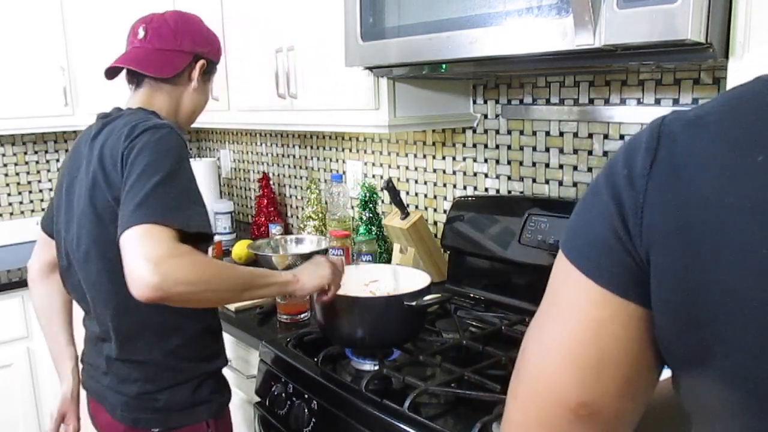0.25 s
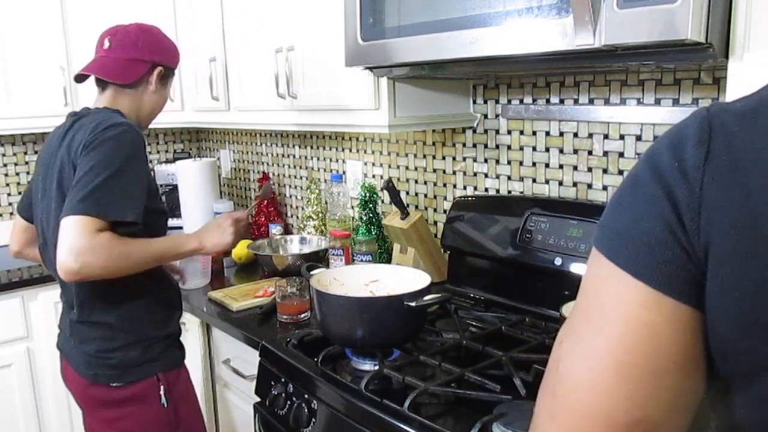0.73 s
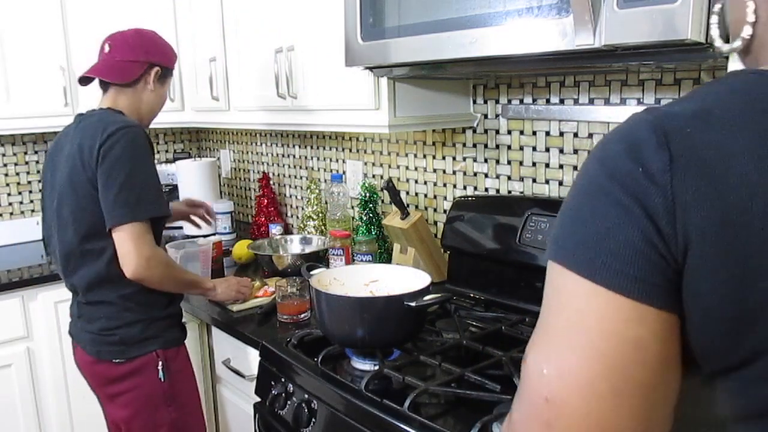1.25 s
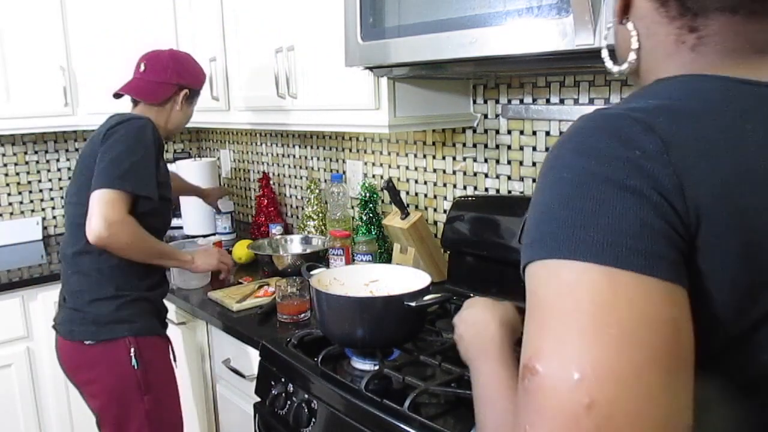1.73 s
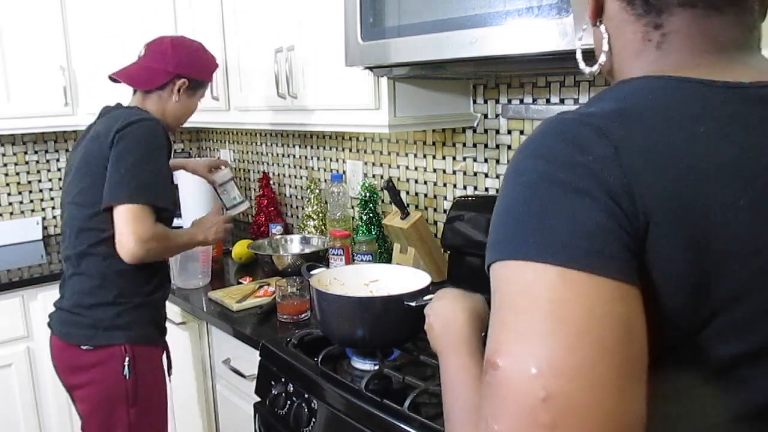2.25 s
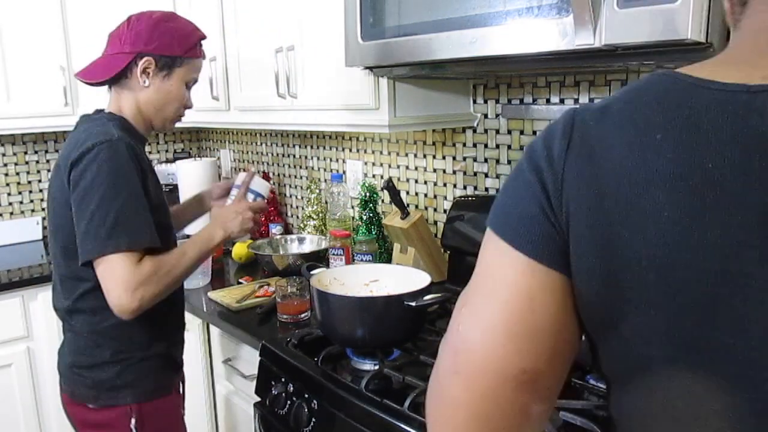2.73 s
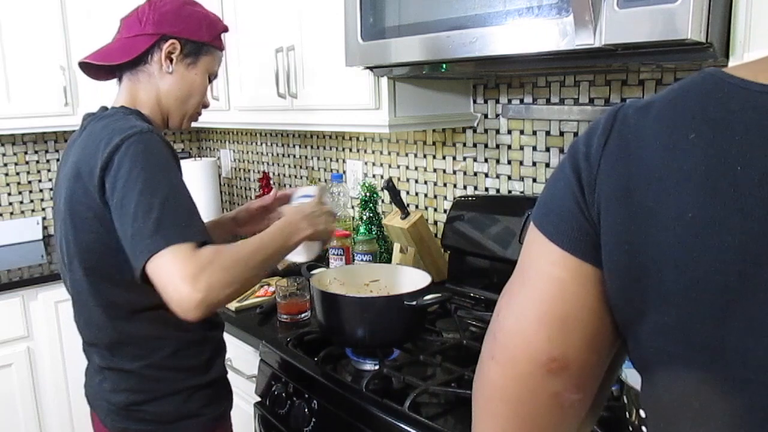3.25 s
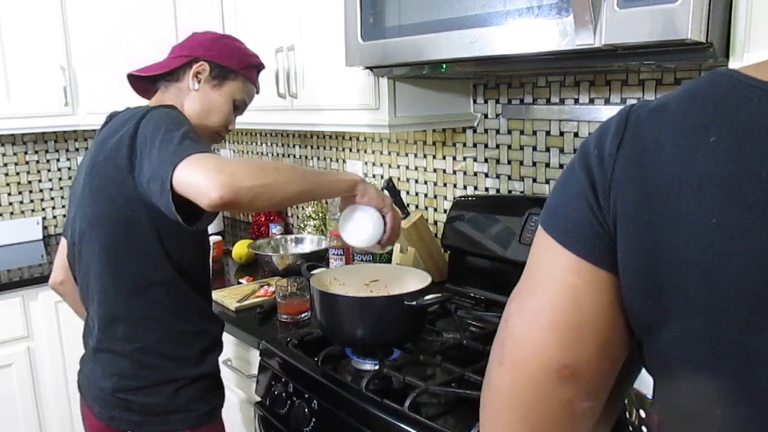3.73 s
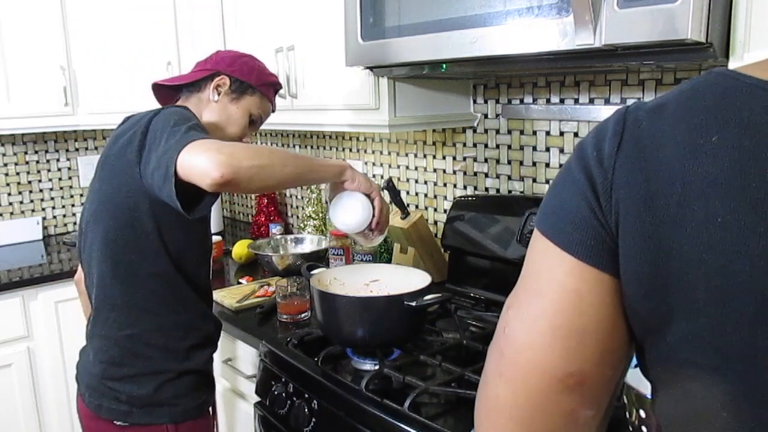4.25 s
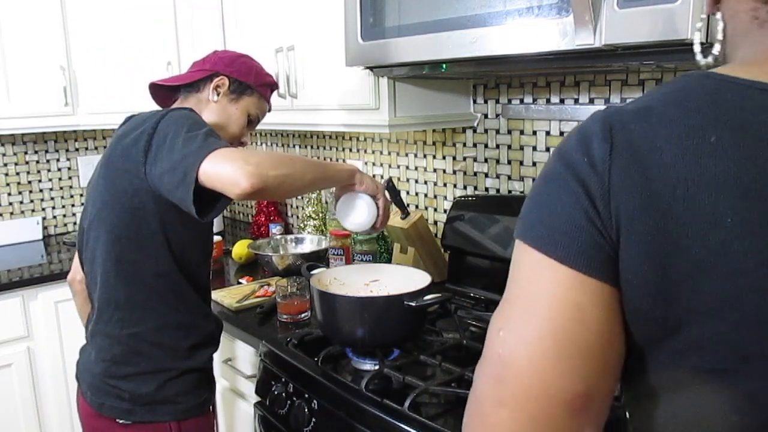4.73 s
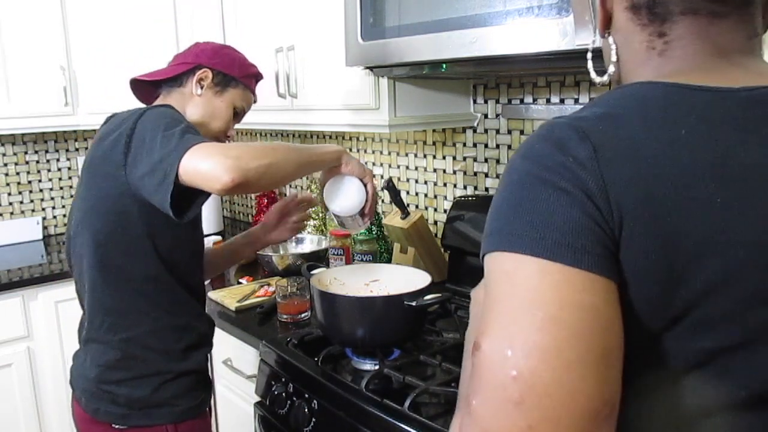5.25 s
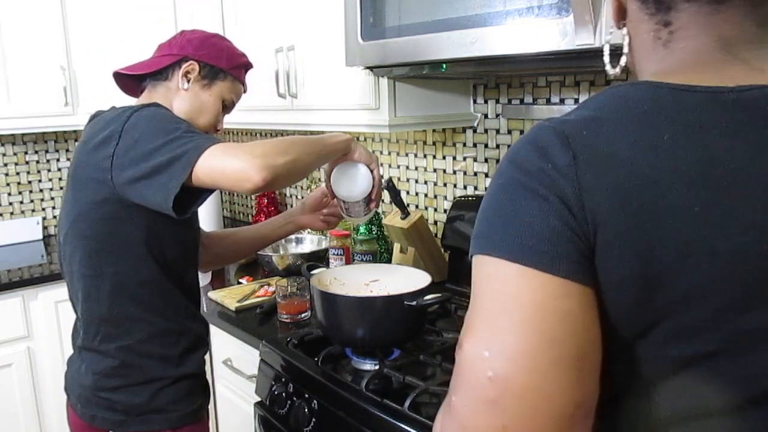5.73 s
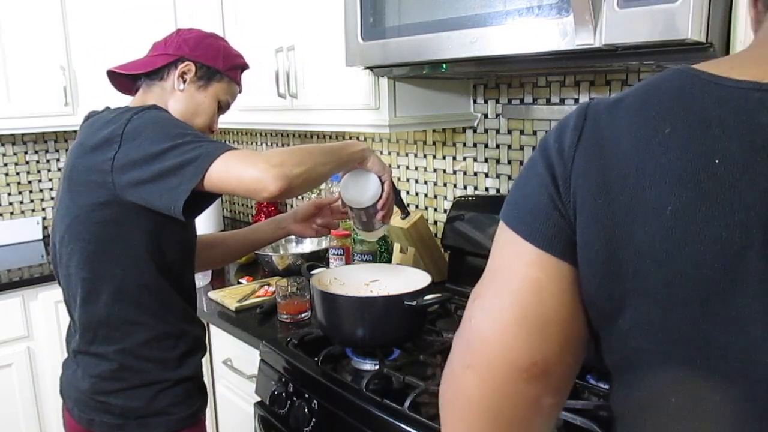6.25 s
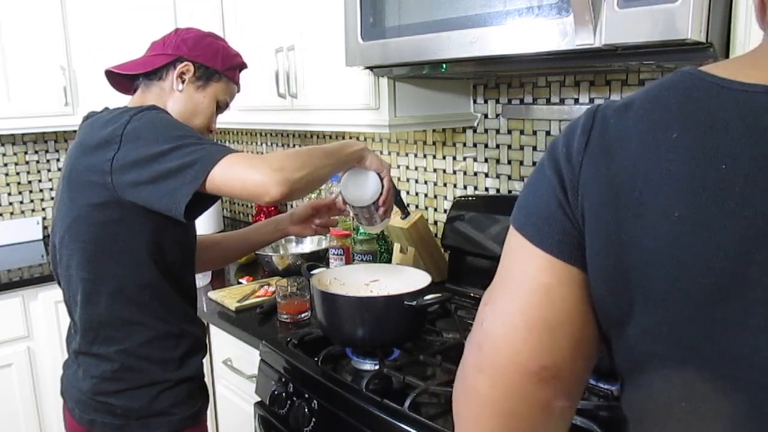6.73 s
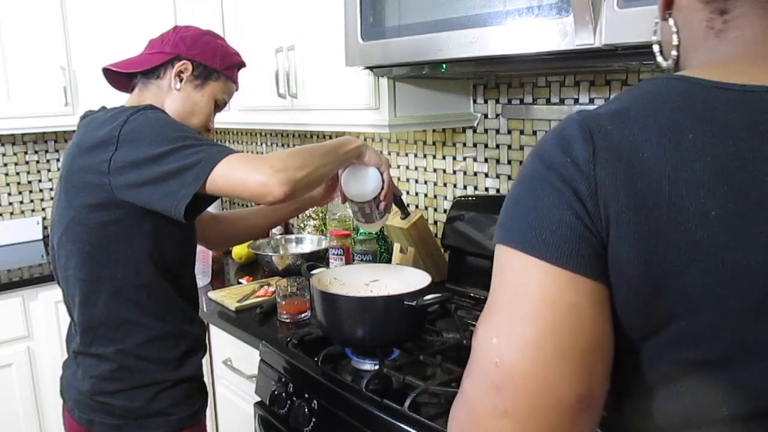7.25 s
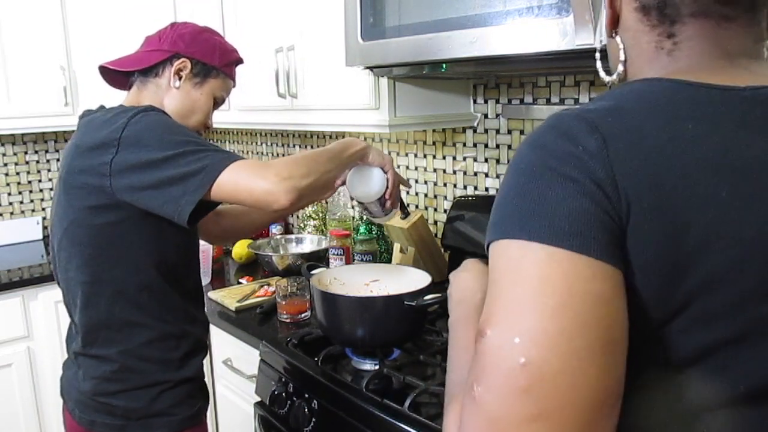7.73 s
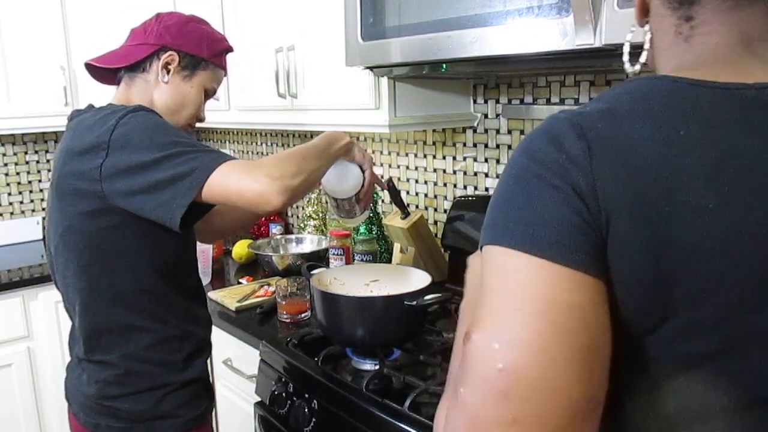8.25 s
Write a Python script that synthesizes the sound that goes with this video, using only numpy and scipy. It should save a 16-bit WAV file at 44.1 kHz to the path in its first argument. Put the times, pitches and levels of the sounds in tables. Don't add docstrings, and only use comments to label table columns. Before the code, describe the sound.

A small stereo microphone a few steps away hears a hard, reverberant kitchen with low gas-flame rumble, faint hum and smooth hiss. The tail of an earlier knock opens it; a spoon strikes a filled pot's rim at 0.2 and 0.47 s, bright, clanky and quickly damped, with a dull stove thump. Light ticks come at 1.3 s, then the spoon clacks onto a board at 1.55 s. From 1.9 to 2.8 s a cardboard salt drum is picked up: hollow knocks, scrapes, clicks and sliding grains; a faint tap at 3.1. From 3.4 to 5.1 s salt hisses in quick strokes, about eleven a second, gradually softening. A strong hollow tap at 5.4 s leads into lighter taps, rubbing and clicks; softer shakes return at 6.2-6.6 s. From 7.0 s to the end at 8.5, finger taps fall about every 0.2 s, with grain puffs and crisp ticks.

```python
import sys
import numpy as np
from scipy import signal
from scipy.fft import rfft, irfft, next_fast_len
from scipy.io import wavfile

SR = 44100
rng = np.random.default_rng(int(sys.argv[2]) if len(sys.argv) > 2 else 0)


def pcm_store(signal):
    levels = np.round(np.clip(np.atleast_2d(signal), -1, 1) * 32767)
    wavfile.write(sys.argv[1], SR, levels.astype(np.int16).T)


def gain_from_db(level_db):
    decades = np.asarray(level_db, float) / 20
    return 10 ** decades


N = 374850
LEAD_S = 0.15
M = N + round(LEAD_S * SR)


# peak in [s], level in [dB].
SHAKES = [(3.432, -42), (3.539, -39.5), (3.624, -37.5), (3.72, -40), (3.765, -40), (3.827, -38),
          (3.91, -40), (4.002, -41.5), (4.102, -43), (4.179, -42), (4.27, -42), (4.354, -42.5),
          (4.447, -43), (4.528, -42.5), (4.62, -44.5), (4.702, -51), (4.798, -44), (4.883, -41),
          (4.959, -44), (5.06, -48), (6.172, -42.5), (6.252, -47), (6.32, -51.5), (6.386, -46.5),
          (6.448, -44), (6.524, -42), (6.594, -46)]
# peak in [s], level in [dB], length in [ms].
SLIDES = [(1.967, -51.5, 42), (2.224, -49, 83), (2.3, -55.5, 200), (2.752, -53, 32), (2.83, -58.5, 270),
          (5.605, -39.5, 47), (5.73, -55, 120), (8.025, -51, 32), (8.097, -45.5, 82), (8.27, -50.5, 51),
          (8.38, -50.5, 60), (8.455, -49.5, 82)]


def surges():
    s, db = np.transpose(SHAKES)
    gaps_ms = 1000 * np.diff(s, prepend=0, append=N / SR)
    mean_gap_ms = (gaps_ms[1:] + gaps_ms[:-1]) / 2
    throw_ms = np.minimum(0.65 * mean_gap_ms, 59)

    pouring_s = 3.4
    jump_s, jump_ms = 0.052, 41
    jumps = []
    for tap_s, *_, snap_db in TAPS:
        if pouring_s < tap_s < N / SR - jump_s:
            jump_db = -48 + 0.42 * (snap_db + 37)
            jumps.append((tap_s + jump_s, jump_db, jump_ms))
    return [*zip(s, db, throw_ms), *SLIDES, *jumps]


# frequency in [Hz], density in [dB per Hz].
SALT = [(1290, -26), (2200, -11.5), (3130, -12), (3600, -7), (3900, -7.5), (4640, -2.5), (5690, 1.5),
        (7650, -7), (8370, -5.5), (9940, -11.5), (13200, -8.5), (15600, -16)]
# time in [s], gain above 8 kHz in [dB].
SPOUT = [(3.6, 4), (5.2, 1.5), (5.7, 3), (8.5, 5.5)]


def salt():
    t, power = np.arange(M) / SR - LEAD_S, np.zeros(M)
    for s, db, ms in surges():
        near = slice(round((s + LEAD_S - 0.15) * SR), round((s + LEAD_S + 0.15) * SR))
        late = (t[near] - s) * 1665 / ms
        steepness = np.where(late < 0, 1.35, 1.15)
        power[near] += gain_from_db(2 * db) * np.exp(-(late * steepness) ** 2)

    strength = gain_from_db(1.8 * np.minimum(rng.exponential(1, M), 5))
    hits = rng.random(M) < 12000 / SR
    hiss = colour(strength * hits * pair(0.38), SALT)
    fine = signal.sosfilt(signal.butter(2, 8000, "high", fs=SR, output="sos"), hiss)
    spout_gain = gain_from_db(in_time(SPOUT)[0])
    return np.sqrt(power) * gain_from_db(0.5 * drift(60)) * (hiss + (spout_gain - 1) * fine)


# start in [s], then levels of air thud, lid, wall and snap in [dB].
TAPS = [(1.907, -39.5, -45.5, -39, -37.5), (3.075, -48.5, -70, -56, -48), (5.426, -30, -28, -31, -38),
        (5.635, -46, -38, -34.5, -43), (5.808, -38.5, -32, -38.5, -43.5), (6.013, -44, -62, -44, -50),
        (6.265, -41, -55, -45, -54), (7.021, -34.5, -38, -34, -32), (7.23, -36, -56, -35.5, -38.5),
        (7.433, -33.5, -40, -34.5, -32.5), (7.633, -33, -49.5, -61, -35), (7.828, -36.5, -43.5, -52, -34),
        (8.042, -34.5, -45, -43, -34.5), (8.252, -36.5, -57, -36.5, -37), (8.452, -34.5, -44, -50, -36.5)]
# frequency in [Hz], level in [dB], t60 in [s].
DRUM = [
    [(269.5, 7, 0.047)],
    [(468, 0, 0.13), (571, 0, 0.065)],
    [(733, -1.5, 0.16), (1200, -15, 0.06)],
    [(2050, 1.5, 0.033), (2340, -16, .025)],
    [(4800, 1.5, 0.018)],
]
# frequency in [Hz], width as a [ratio],
# level above the group in [dB], t60 in [s].
BODY = [(268, 1.64, -2, 0.13), (448, 1.22, -2, 0.16), (850, 1.84, -7.5, 0.3), (2145, 1.09, -3.5, 0.057),
        (5000, 1.67, -4.5, 0.1)]


def taps():
    bus = np.zeros((2, M))
    for s, *levels, snap_db in TAPS:
        slap_db = snap_db - 2.5
        levels = [*levels, slap_db, snap_db]
        modes = [(hz, d + db, t60) for group, db in zip(DRUM, levels) for hz, d, t60 in group]
        add(bus, s, ring(modes, contact_ms=0.77))
        for (hz, width, d, t60), db in zip(BODY, levels):
            alike = np.clip(1.05 - hz / 9000, 0, 1)
            add(bus, s, clatter(db + d, band(hz, width, 6.56), t60, alike, rise_ms=1300 / hz))
    return bus


# start in [s], length in [s], level in [dB].
DRAG = [
    (2.086, 0.051, -58),
    (2.19, 0.35, -58.5),
    (5.474, .43, -60),
]


def drag():
    t = np.arange(M) / SR - LEAD_S
    resonance = signal.butter(2, [1330, 1680], "band", fs=SR, output="sos")
    rub = signal.sosfilt(resonance, rng.standard_normal(M))
    attack_s, release_s, sag_db = 0.027, 0.032, -4.5
    stroke = np.zeros(M)
    for s, length, db in DRAG:
        corners_s = [s - attack_s, s, s + length, s + length + release_s]
        stroke += np.interp(t, corners_s, [0, gain_from_db(db), gain_from_db(db + sag_db), 0])
    return stroke * gain_from_db(1.7 * drift(30)) * rub / rub.std()


# start in [s], level in [dB], frequency in [Hz], sharpness of the peak in [dB].
CONTACTS = [(1.271, -46, 5700, 6), (1.305, -35, 1150, 6), (1.304, -43.5, 535, 4.5),
            (1.304, -40.5, 2600, 3.5), (1.3376, -42, 10500, 2), (1.909, -32.5, 570, 8.5),
            (1.922, -31.5, 548, 12), (2.064, -45, 1730, 4), (2.169, -40.5, 6400, 5), (2.189, -40, 2260, 3),
            (2.199, -39.5, 2020, 6), (2.289, -36.5, 4230, 1), (2.435, -44, 1510, 1), (2.722, -43, 3260, 5),
            (2.735, -38, 8630, 16), (2.75, -39.5, 5470, 14), (2.821, -39, 7400, -2), (3.216, -43, 4250, 6),
            (5.3474, -45, 8800, 14), (5.374, -44, 2800, 12), (5.427, -46, 112.3, 20), (5.582, -42, 4800, 11),
         (5.597, -26, 6200, 10), (5.7743, -37, 7800, 12), (5.81, -51, 90, 11), (6.015, -43, 127, 2.5),
         (6.258, -36.5, 616, 7), (6.687, -38, 2410, 4.5), (6.7, -46, 3260, 5), (6.829, -45, 5400, 7),
         (6.949, -44, 850, 8), (7.216, -31.5, 2660, 16.5), (7.5527, -39.5, 8850, 11), (7.734, -44, 814, 3),
         (8.02, -31.5, 6050, 2), (8.095, -37, 6100, 14), (8.1394, -35, 7740, 8), (8.171, -39, 805, 6),
         (8.2422, -32, 1677, 9), (8.3304, -35, 8300, 9), (8.425, -34.5, 5480, 12)]


def ticks():
    bus = np.zeros((2, M))
    for s, db, hz, sharp_db in CONTACTS:
        t60 = 0.066 * (hz / 1000) ** -0.21
        add(bus, s, clatter(db - 3.0, band(hz, 1.152, sharp_db), t60, 0.83, rise_ms=1.0))
        add(bus, s, ring([(hz, db - 15.5 + 0.52 * sharp_db, t60)], contact_ms=0.9))
    return bus


def spoon_blows(blows, modes, spectrum):
    bus = np.zeros((2, M))
    for s, db, tilt, clatter_db, t60 in blows:
        struck = [(hz, db + d + tilt * np.log2(hz / 3000), mode_t60) for hz, d, mode_t60 in modes]
        add(bus, s, ring(struck, contact_ms=2.1))
        add(bus, s, clatter(clatter_db, spectrum, t60, 0.97, rise_ms=0.34))
        add(bus, s, clatter(clatter_db + 1.5, band(3750, 2.83, 18.0), 0.0066, 0.58, rise_ms=0.2))
    return bus


# start in [s], ring in [dB], brightness in [dB per octave], clatter in [dB],
# clatter t60 in [s].
KNOCKS = [
    (-.09, -24, -1.5, -15, 0.086),
    (0.1898, -23.5, 1, -13.5, 0.071),
    (0.4658, -22, 1.3, -13, 0.046),
]
# frequency in [Hz], level in [dB], t60 in [s].
POT = [(232, -5, .08), (410, -8, 0.11), (464, -24, 0.081), (590, -1, 0.085), (730, -4, 0.047),
       (1076, -3.5, 0.034), (2600, -4, 0.037), (3350, -19, 0.037), (4370, -11, 0.042), (4850, -13, 0.037),
       (5400, -14, 0.02), (5500, 3, 0.034), (5700, -7, 0.03), (5670, -13, 0.019), (6920, 7, 0.031),
       (6800, -19, 0.051), (6800, -17, 0.03), (7500, 1, 0.047), (8610, -5.5, 0.089), (9900, -8, .05),
       (11100, -16, .16), (12070, -18, 0.08), (14200, -21, .05)]
# frequency in [Hz], density in [dB per Hz].
POT_CLATTER = [(88, -71), (150, -27), (260, -11.5), (500, -4.5), (800, -10.5), (1130, -9), (1270, -17),
               (1900, -18), (2610, -16.5), (3360, -10), (3850, -24), (5500, -3.5), (6350, -9),
               (7200, -10.5), (8060, -13.5), (8710, -13), (10600, -26), (11900, -13), (15600, -23.5)]


def pot_knocks():
    return spoon_blows(KNOCKS, POT, POT_CLATTER)


# frequency in [Hz], density in [dB per Hz].
THUMP = [(30, -2), (55, 12), (110, -31), (200, -10), (400, -18)]


def stove():
    bus = np.zeros((2, M))
    for s, db, *_ in KNOCKS:
        add(bus, s + 0.0022, clatter(db - 18, THUMP, 0.45, 0.87, rise_ms=8.8))
    return bus


# start in [s], ring in [dB], brightness in [dB per octave],
# clatter in [dB], clatter t60 in [s].
LAID = [
    (1.528, -63, -9, -41, 0.11),
    (1.542, -58, -7, -33, .05),
    (1.553, -43, 0.5, -27, 0.061),
    (1.57, -44.5, -12.5, -37, 0.037),
]
# frequency in [Hz], level in [dB], t60 in [s].
SPOON = [(1093, -3.5, 0.029), (2950, 11, 0.022), (4480, -3, 0.17), (7027, 6, 0.16), (8160, -20, .06),
         (11530, -17, .15), (13220, -11, .1), (10200, -7, .2), (11100, -10, .2)]
# frequency in [Hz], density in [dB per Hz].
SPOON_CLATTER = [(180, -44), (300, -6), (1070, -3.5), (2390, -4.5), (2900, 0.5), (6070, -12.5), (7130, -7),
                 (7720, -15), (14000, -43)]


def spoon_laid():
    return spoon_blows(LAID, SPOON, SPOON_CLATTER)


# frequency in [Hz], t60 in [s].
KITCHEN = [(120, 0.71), (400, 0.48), (1500, 0.74), (5000, 0.45), (10000, 0.52), (15000, 0.33)]


def kitchen(x, alike_hz):
    t, tail = np.arange(SR) / SR, 0
    for hz in 60 * 2 ** np.arange(9):
        edges_hz = [hz / 2 ** 0.5, min(hz * 2 ** 0.5, 0.45 * SR)]
        octave = signal.butter(2, edges_hz, "band", fs=SR, output="sos")
        noise = pair(1 / (1 + (hz / alike_hz) ** 2), size=SR)
        tail = tail + signal.sosfilt(octave, noise) * gain_from_db(-60 * t / at_hz(KITCHEN, hz))
    tail = tail * (1 - np.exp(-t / 0.003))
    return signal.fftconvolve(x, tail / np.sqrt(np.sum(tail ** 2) / 2), axes=1)[:, :M]


# time in [s], gain in [dB].
GAIN = [(0.9, -8), (2.19, -1.5), (3.42, 0.5), (3.65, -0.5), (4.77, 0.8), (5.3, -2), (5.56, 1.5),
        (6.74, -0.3), (8.5, 2.5)]
# frequency in [Hz], density in [dB per Hz].
RUMBLE = [(15, -38), (25, -4.5), (54, -3.5), (166, -7), (286, -4), (378, -7), (423, -6.5), (465, -3.5),
          (560, -3.5), (689, -4.5), (947, -2.5), (1140, -17), (1480, -9), (2200, -20), (2860, -31),
          (4840, -120)]
# frequency in [Hz], density in [dB per Hz].
HISS = [(650, -21), (1100, -4), (1220, -8), (1300, -6.5), (1620, -10), (2090, -14), (2240, -8.5),
        (3340, -10.5), (6420, -9), (10000, -15), (15600, -17.5)]


def background():
    gain_db, = in_time(GAIN)
    rumble_db, hiss_db = -53.5 + 0.36 * gain_db, -51.5 + gain_db
    rumble = gain_from_db(rumble_db + 1.6 * drift(39)) * colour(pair(0.24), RUMBLE)
    hiss = gain_from_db(hiss_db + 0.5 * drift(1.1)) * colour(pair(0.2), HISS)

    hum_hz, hum_db = 56, -72
    waver_db, slip_rad = 1.8 * drift(3), 0.7 * drift(2.5)
    hum = gain_from_db(hum_db + waver_db) * np.sin(2 * np.pi * hum_hz * np.arange(M) / SR + slip_rad)
    return rumble + hum + hiss


def ring(modes, contact_ms):
    t = np.arange(SR // 3) / SR
    hz, db, t60 = np.transpose(modes)[:, :, None, None]
    ear_phase = rng.normal(0, 1, (len(hz), 2, 1)) * np.minimum(hz / 2500, 1.5)
    phase = rng.uniform(0, 2 * np.pi, hz.shape) + ear_phase
    rise = 1 - np.exp(-t * 1000 / (0.15 * contact_ms + 1500 / hz))
    return np.sum(rise * gain_from_db(db - 60 * t / t60) * np.sin(2 * np.pi * hz * t + phase), axis=0)


def clatter(db, spectrum, t60, alike, rise_ms):
    t = np.arange(SR // 4) / SR
    fade = gain_from_db(db - 60 * t / t60) * (1 - np.exp(-t * 1000 / rise_ms))
    return fade * colour(pair(alike, size=len(t)), spectrum)


def band(hz, width, skirt_db):
    return [(hz / width ** 4, -5 * skirt_db), (hz / width, -skirt_db), (hz, 0), (hz * width, -skirt_db),
            (hz * width ** 4, -3.5 * skirt_db), (hz * width ** 10, -9 * skirt_db)]


def at_hz(points, hz):
    points = np.array(points)
    return np.interp(np.log(np.maximum(hz, 1)), np.log(points[:, 0]), points[:, 1])


def in_time(rows):
    s, *columns = np.transpose(rows)
    return [np.interp(np.arange(M) / SR - LEAD_S, s, c) for c in columns]


def colour(x, spectrum):
    length = x.shape[-1]
    size = next_fast_len(length)
    gain = gain_from_db(at_hz(spectrum, np.arange(size // 2 + 1) * SR / size))
    y = irfft(rfft(x, size) * gain, size)[..., :length]
    return y / np.sqrt(np.mean(y ** 2))


def pair(alike, size=M):
    mid, side = rng.standard_normal((2, size))
    return np.sqrt((1 + alike) / 2) * mid + np.sqrt((1 - alike) / 2) * side * [[1], [-1]]


def drift(rate):
    r = np.exp(-80 * np.pi * rate / SR)
    slow = signal.lfilter([1], [1, -2 * r, r * r], rng.standard_normal(M // 40 + 2002))[2000:]
    return np.interp(np.arange(M) / 40, np.arange(len(slow)), slow / slow.std())


def add(bus, s, sound):
    at = round((s + LEAD_S) * SR)
    bus[:, at:at + sound.shape[-1]] += sound[..., :M - at]


def scene():
    grains, drum, pot = salt(), taps(), pot_knocks()
    small = spoon_laid() + ticks() + drag()
    wet = gain_from_db(-5) * grains + gain_from_db(-8.0) * drum + gain_from_db(-1.0) * pot + gain_from_db(-1.0) * small
    direct = gain_from_db(2.0) * grains + drum + pot + stove() + small
    return (direct + kitchen(wet, alike_hz=620) + background())[:, -N:]


def band_limit(x):
    return signal.sosfilt(signal.butter(12, 17020, fs=SR, output="sos"), x)


# frequency in [Hz], left minus right in [dB].
LEAN = [(60, -0.5), (150, -0.5), (380, -1.5), (950, -2), (2380, 1.5), (5980, 4.0), (15000, 8.5)]


def record(dry):
    size = next_fast_len(N)
    lean_db = at_hz(LEAN, np.arange(size // 2 + 1) * SR / size) / 2
    x = irfft(rfft(dry, size) * gain_from_db(lean_db * [[1], [-1]]), size)[:, :N]
    x = signal.sosfilt(signal.butter(2, 36, "high", fs=SR, output="sos"), x)
    x = signal.lfilter(*signal.iirnotch(7885, 55, fs=SR), x)
    x = signal.sosfilt(signal.cheby2(22, 55, 16100, fs=SR, output="sos"), x)
    return band_limit(x)


dry = scene()
out = record(dry)
pcm_store(out)
```